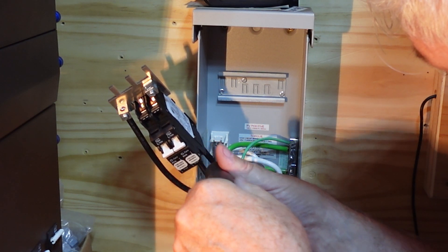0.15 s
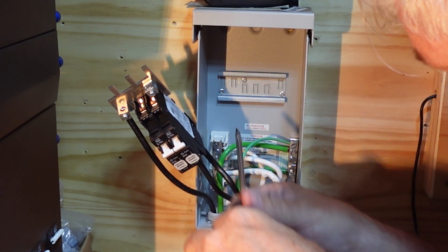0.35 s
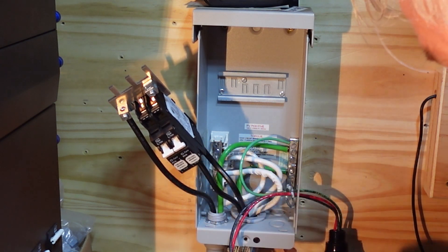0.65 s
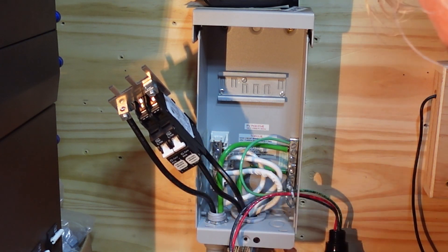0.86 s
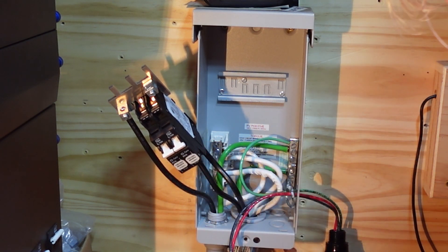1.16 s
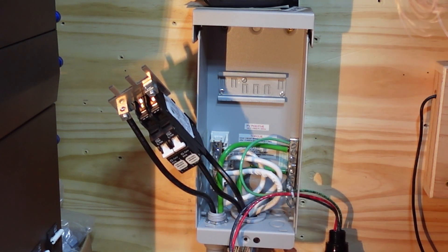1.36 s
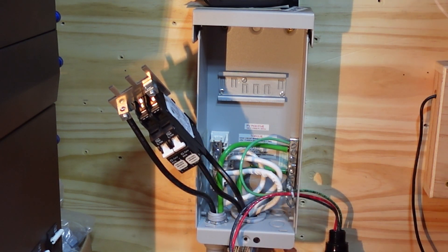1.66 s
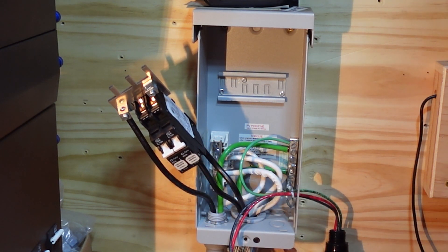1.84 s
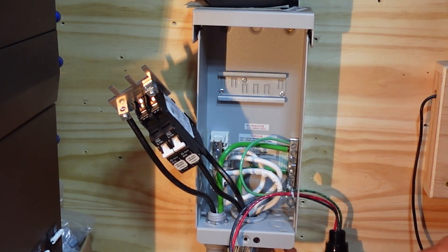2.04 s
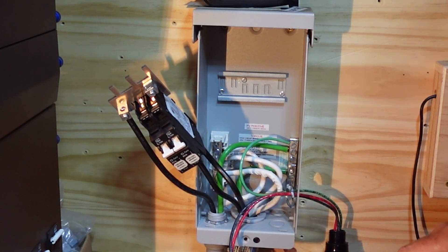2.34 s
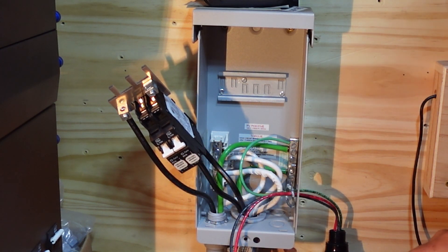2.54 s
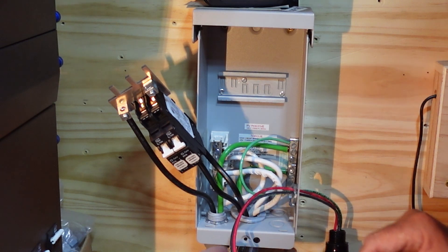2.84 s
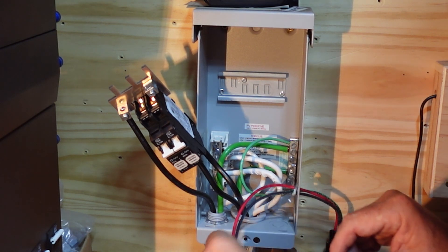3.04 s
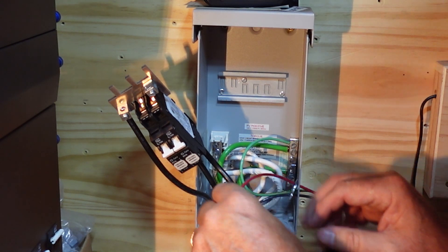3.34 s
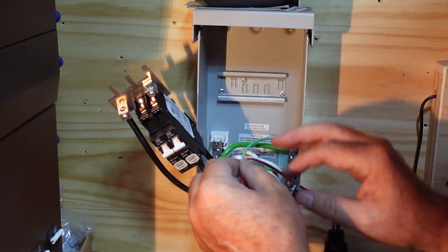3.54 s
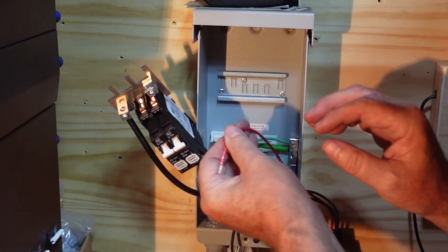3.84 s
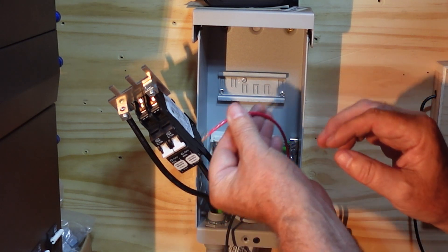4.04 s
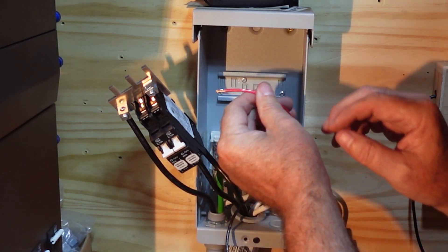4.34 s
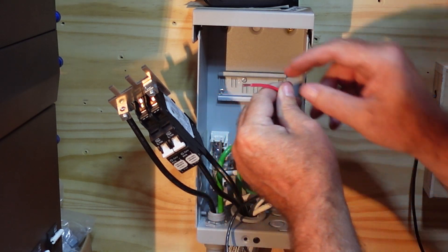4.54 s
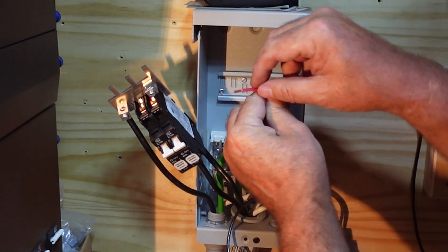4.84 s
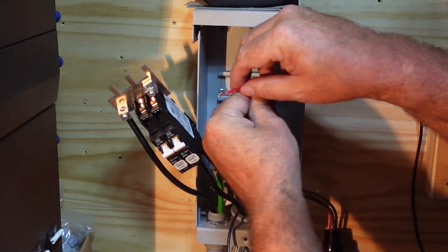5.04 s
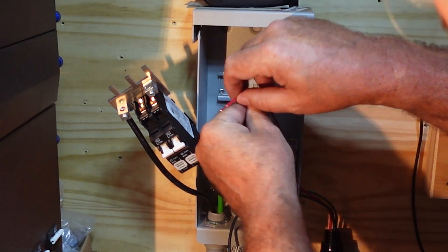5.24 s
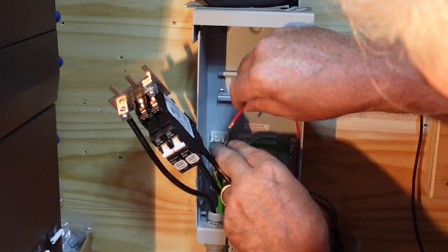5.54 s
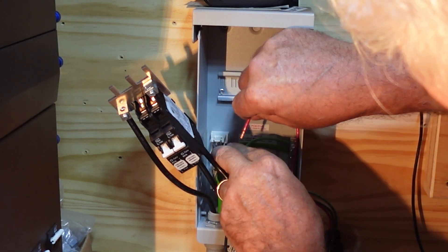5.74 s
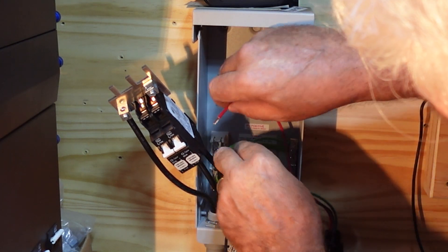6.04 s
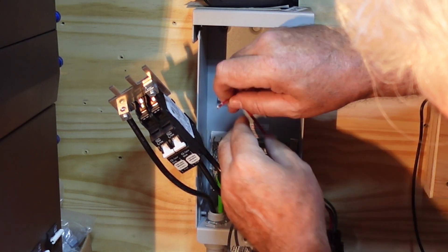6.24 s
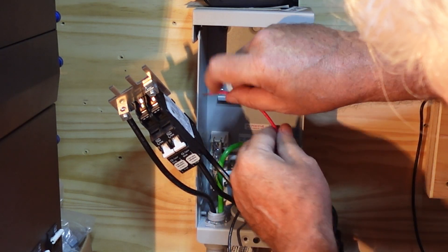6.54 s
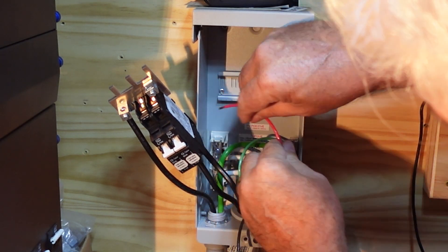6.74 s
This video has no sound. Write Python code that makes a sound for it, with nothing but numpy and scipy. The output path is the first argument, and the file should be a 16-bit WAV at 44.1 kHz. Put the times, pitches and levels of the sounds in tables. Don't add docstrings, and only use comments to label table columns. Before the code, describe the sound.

Close, hissy shed sound: a loud steel-on-wood clatter, dwindling wobble taps, then wire tugs knocking sheet metal, small copper ticks, scrapes and low plank thumps.

```python
import sys
import numpy as np
from scipy import signal
from scipy.fft import rfft, irfft, next_fast_len
from scipy.io import wavfile
from scipy.ndimage import uniform_filter1d

SR = 44100
rng = np.random.default_rng(int(sys.argv[2]) if len(sys.argv) > 2 else 0)


def volts(x):
    e = np.asarray(x, float) / 20
    return 10 ** e


def master_out(mix):
    frames = np.transpose(np.atleast_2d(mix))
    ceiling = np.clip(frames, -1, 1)
    pcm = np.round(ceiling * 32767).astype(np.int16)
    wavfile.write(sys.argv[1], SR, pcm)


N = 303849
SPAN = 16384
BENCH_PAN_DB, BOX_PAN_DB = -2, -1.5
GRIP_SHIFT = 0.025

# (frequency [Hz], width [Hz], level [dB])
BOX = [(589, 23, -1), (1285, 41, 3.5), (1715, 100, 5), (2240, 54, 1.5), (2497, 93, -5), (3340, 64, -4.5),
       (3950, 22, -11), (3900, 100, -17.5), (4380, 76, -29), (5370, 68, -23), (6000, 130, -30.5),
       (6270, 18, -35), (7500, 65, -25.5), (9100, 76, -31.5)]
# (frequency [Hz], density [dB per Hz])
BOX_BED = [(180, -71), (300, -20), (591, -11), (908, -9.5), (1700, -2), (2040, -38), (2260, -10),
           (2890, -11), (4600, -11), (7000, -29.5), (15600, -41)]
# (frequency [Hz], width [Hz], level [dB])
BENCH = [(190, 110, 3.5), (829, 230, 5.5), (1800, 77, -16), (2335, 60, -3.5), (2880, 14, -20.5),
         (2920, 36, -17), (3190, 32, -12), (3560, 54, -6), (4160, 22, -21), (5210, 170, -51.5),
         (6100, 35.3, -28.5), (6040, 28, -29.5), (6470, 73, -18)]
# (frequency [Hz], density [dB per Hz])
BENCH_BED = [(35, -76), (60, -34), (163, 6.5), (476, -4.5), (852, -6), (1450, -25), (2430, -5.5),
             (2730, -16), (3780, -13), (7000, -17.5), (15600, -40)]


def unit(x):
    return x / np.sqrt(np.mean(x ** 2) + 1e-20)


def panned(x, pan_db):
    return x * volts([[pan_db / 2], [-pan_db / 2]])


def along(points, hz):
    f, v = np.transpose(points)
    return np.interp(np.log(hz + 1), np.log(f + 1), v)


def filtered(x, response):
    m = next_fast_len(x.shape[-1] + 8192)
    spectrum = rfft(x, m) * response(np.fft.rfftfreq(m, 1 / SR))
    return irfft(spectrum, m)[..., :x.shape[-1]]


def steep(f, hz):
    return f ** 6 / (f ** 6 + hz ** 6)


def body(modes, bed, bed_db, luck_db):
    loss = 0.012

    def response(f):
        lines = 0
        for k, (hz, width, db) in enumerate(modes):
            damping = 1j * f * (width + loss * hz)
            resonance = damping / (hz * hz - f * f + damping)
            lines = lines + (-1) ** k * volts(db + luck_db[k]) * resonance
        return lines + volts(along(bed, f) + bed_db)
    return response


def strikes(rows, modes, bed, bed_db, low_hz, high_hz, soft_hz, rise, lead_db, gain_db, bass_pan, shift=0):
    lead = 800
    out, f = np.zeros((2, N + SPAN)), np.fft.rfftfreq(SPAN, 1 / SR)
    t = (np.arange(SPAN) - lead) / SR
    after = np.maximum(t, 0)
    low, high = 1 - steep(f, low_hz), steep(f, high_hz)
    yielding = 1 / (1 + (f / soft_hz) ** 2)
    bands = np.array([1 - low - high, high * yielding, low])
    for s, db, treble_db, low_db, length, pan_db in rows:
        blow = volts(-60 * after / max(length, 0.002)) * (1 - np.exp(-after / (rise * length)))
        creak = volts(lead_db - 60 * np.abs(t) / 0.057)
        push = rng.standard_normal(SPAN) * (blow + creak)
        struck = body(modes, bed, bed_db, rng.normal(0, 3, len(modes)))
        detuned = f * (1 + shift * rng.standard_normal())
        parts = irfft(rfft(push) * struck(detuned) * bands, SPAN)
        levels = db + gain_db + np.array([0, treble_db, low_db])
        levels = levels + np.outer([0.5, -0.5], [1, 1, bass_pan]) * pan_db
        out[:, round(s * SR) - lead:][:, :SPAN] += volts(levels) / np.abs(parts).max(axis=1) @ parts
    return out[:, :N]


def rings(rows, modes):
    out, t = np.zeros(N + SPAN), np.arange(SPAN) / SR
    for s, db in rows:
        luck_db = rng.normal(0, 1.5, len(modes))
        for (hz, level_db, t60), extra_db in zip(modes, luck_db):
            decay = volts(db + level_db + extra_db - 60 * t / t60)
            out[round(s * SR):][:SPAN] += decay * np.sin(2 * np.pi * hz * t)
    return out[:N]


def grit(per_second, smooth):
    slips = (rng.random(N) < per_second / SR) * rng.standard_normal(N)
    return unit(slips) + smooth * rng.standard_normal(N)


def strokes(rows):
    grip_s, let_go_s = 0.014, 0.021
    t = np.arange(N) / SR
    power = 0
    for s, length, *db in rows:
        hold = np.interp(t - s, [-grip_s, 0, length, length + let_go_s], [0, 1, 1, 0])
        power = power + np.outer(volts(db), hold) ** 2
    return np.sqrt(power)


def on_box(rows):
    panel_db, follows = -42, 0.52
    contacts = []
    for s, db, treble_db, length in rows:
        low_db = panel_db + follows * (db + 28) - db
        contacts.append((s, db, treble_db, low_db, length, BOX_PAN_DB))
    return contacts


def wires_on_box():
    # (time [s], peak [dB], treble [dB], contact length [s])
    wire_ends = [(3.263, -37.5, 9, 0.015), (3.281, -24, -3, 0.042), (3.297, -32.5, 2, 0.032),
                 (3.58, -37.5, -2, 0.057), (3.605, -42.5, -5, 0.018), (3.663, -35.5, -8, 0.013),
                 (3.763, -49, 2.5, 0.067), (3.789, -39, -8, 0.06), (3.816, -34, -4.5, 0.031),
                 (3.841, -28.5, -12.5, 0.03), (3.864, -35, -5, 0.023), (3.896, -33, -6, 0.019),
                 (3.902, -21.5, -11.5, 0.022), (3.955, -36.5, -3.5, 0.024), (3.969, -28, -1.5, 0.039),
                 (4.024, -41, -27, 0.026), (6.659, -44.5, 3.5, 0.07)]
    # (time [s], peak [dB], treble [dB])
    tugs = [(3.09, -21, -6.5), (3.098, -22, -10), (3.107, -20.5, -13.5), (3.116, -14.5, -10.5),
            (3.126, -20.5, -11), (3.139, -23.5, -12), (3.149, -20, -15), (3.157, -24.5, -4.5),
            (3.172, -33, -15.5), (3.358, -25, -6), (3.364, -19.5, -18.5), (3.369, -20.5, 7),
            (3.377, -9.5, -14), (3.387, -16, -10.5), (3.396, -23, -1), (3.405, -28.5, -9.5),
            (3.422, -27.5, -44), (6.74, -25.5, 3), (6.762, -18.5, -4), (6.779, -17, -4.5),
            (6.798, -20.5, -15), (6.811, -27, -2)]
    # (time [s], peak [dB], treble [dB], panel [dB], contact length [s])
    jolts = [(6.197, -39.5, -15, -15, 0.062), (6.207, -40, -15, -9, 0.034), (6.233, -31.5, -9, -16, 0.036),
             (6.235, -19.5, -8.5, -28, 0.043), (6.244, -20, -8, -25, 0.013), (6.269, -40, -27, -2.5, 0.026),
             (6.284, -37.5, -18, -7, 0.059), (6.319, -43, -20, -12, .05)]
    slip_s = 0.036
    rows = on_box(wire_ends + [(*tug, slip_s) for tug in tugs])
    rows += [(*jolt, BOX_PAN_DB) for jolt in jolts]
    return strikes(rows, BOX, BOX_BED, -2.9, low_hz=905, high_hz=3160, soft_hz=14600, rise=0.092,
                   lead_db=-20.5, gain_db=-0.5, bass_pan=1.0, shift=GRIP_SHIFT)


def copper_on_rail():
    # (time [s], peak [dB], treble [dB], low [dB], contact length [s])
    ticks = [(4.36, -49.5, -25.5, -3.5, 0.05), (4.598, -34, -4, -27, 0.017),
             (4.601, -21.5, -2.5, -25, 0.088), (4.6022, -15, -1, -25, 0.019),
             (4.605, -22.5, -0.5, -23, 0.019), (4.7533, -37, -7, -14, 0.017),
             (4.757, -28, -11, -8.5, 0.049), (5.061, -64.5, 18, -13, 0.035), (5.292, -42, -11, -20, 0.12),
             (5.332, -38, -5, -8, 0.07), (5.347, -51.5, 12.5, -4, 0.091), (5.434, -64, 14, -16, 0.08),
             (5.451, -63.5, 14.5, -14, 0.074), (5.618, -29, 4.5, -17, 0.04), (5.779, -26, -7, -16, 0.055),
             (5.82, -26.5, -8, -11.5, 0.044), (5.837, -33.5, -23, 2, 0.014), (5.997, -34, -35, -23, 0.037),
             (6.059, -44, -25, 0, 0.06), (6.488, -33, -8, -37, 0.041), (6.494, -26, -7, -40, 0.018),
             (6.505, -33.5, -1, -9, 0.029), (6.523, -37.5, -7, 4.5, 0.041), (6.581, -55, 7.5, 7, 0.028)]
    # (frequency [Hz], width [Hz], level [dB])
    rail = [(1083, 97, -10.5), (1363, 54, 3.5), (1691, 58, 0), (2276, 48, -3), (3250, 29, -28),
            (4040, 100, -9.5), (5800, 17, -24), (7250, 38, -12.5), (10530, 510, -34)]
    # (frequency [Hz], density [dB per Hz])
    rail_bed = [(120, -45), (200, -21.5), (704, -12), (2220, -1.5), (2800, -12), (4300, -10.5), (5620, -16),
                (6750, -26.5), (7390, -32), (15600, -44)]
    rows = [(*tick, BOX_PAN_DB) for tick in ticks]
    return strikes(rows, rail, rail_bed, -1.5, low_hz=920, high_hz=3260, soft_hz=13680, rise=0.04,
                   lead_db=-36, gain_db=2.0, bass_pan=1.0, shift=GRIP_SHIFT)


def dragging():
    # (time [s], length [s], drag [dB], fizz [dB])
    drags = [(0.0, 0.14, -75, -85.5), (.32, 0.08, -92, -81.5), (.6, 0.022, -88, -71),
             (1.6, 0.13, -75, -58.5), (2.58, 0.05, -61.5, -68), (2.68, .07, -57.5, -84),
             (2.87, 0.074, -50.5, -73), (2.97, 0.22, -57.5, -64), (3.2, 0.32, -58.5, -65.5),
             (3.66, 0.0403, -59.5, -62), (3.82, 0.23, -82, -62), (4.35, 0.247, -64.5, -90),
             (5.09, 0.057, -77, -58), (5.3, 0.34, -70.5, -66), (6.15, 0.18, -58.5, -66),
             (6.38, 0.63, -61.5, -73.5), (6.7, .22, -57.5, -67.5)]
    # (time [s], length [s], drag [dB], edge [dB])
    scrapes = [
        (5.67, 0.092, -43.5, -55.5),
        (5.84, 0.17, -49.5, -50),
        (6.01, 0.098, -56, -61),
        (6.82, .08, -71, -50.5),
    ]
    # (frequency [Hz], width [Hz], level [dB])
    edge_modes = [(4330, 99, -9.5), (4820, 110, 3), (6010, 44, 0.5), (6590, 60, -9), (7300, 50, -6),
                  (8100, 110, -3.5), (9000, 94, -6.5), (11400, 33, -16), (13200, 100, -19)]
    # (frequency [Hz], density [dB per Hz])
    edge_bed = [(2500, 2), (4500, 3.5), (9000, -4), (15800, -13)]
    drag_gain, fizz_gain = strokes(drags)
    scrape_gain, edge_gain = strokes(scrapes)
    drag = filtered(grit(3000, smooth=0.68), body(BOX, BOX_BED, 8.7, np.zeros(len(BOX))))
    fizz = filtered(grit(3300, smooth=1.0), lambda f: volts(along(edge_bed, f)))
    edge = filtered(grit(4000, smooth=0.46), body(edge_modes, edge_bed, -17.5, np.zeros(len(edge_modes))))
    rub = unit(drag) * (drag_gain + scrape_gain) + unit(fizz) * fizz_gain + unit(edge) * edge_gain
    return panned(rub, -1.6)


def coil_rattle():
    # (time [s], peak [dB], treble [dB], contact length [s])
    rattles = [(0.019, -50.5, -5.5, 0.057), (0.146, -56, -25, 0.1), (2.666, -47.5, -1.5, 0.054),
               (2.734, -25, -4.5, 0.045), (2.803, -26.5, -6, 0.047), (2.852, -28, -9.5, 0.043),
               (2.905, -31.5, -13, 0.029), (2.923, -30.5, -13, 0.014), (2.938, -26, -4.5, 0.065),
               (2.968, -26, -15, 0.073), (3.015, -31, -14, 0.035), (3.052, -26, -0.5, 0.057)]
    # (frequency [Hz], width [Hz], level [dB])
    coil = [(568, 14, -9.5), (1040, 42, -4), (1313, 53, -1.5), (1772, 28, 1), (2200, 18, -13.5),
            (3060, 47, -17), (3237, 96, -8), (3650, 170, -23.5), (3930, 48, -12.5), (4200, 73, -11.5),
            (5040, 40, -18), (5320, 38, -15.5), (7350, 230, -29), (8900, 46, -23)]
    # (frequency [Hz], density [dB per Hz])
    coil_bed = [(300, -44), (600, -5), (1500, -14), (2500, -12), (3300, -7), (5300, -6.5), (5900, -33),
                (15600, -38.5)]
    clip = [(9150, -38, .1)]
    knocks = strikes(on_box(rattles), coil, coil_bed, -8.5, low_hz=870, high_hz=2860, soft_hz=12100,
                     rise=0.051, lead_db=-33, gain_db=-1.0, bass_pan=1.0)
    return knocks + rings([row[:2] for row in rattles[3:]], clip)


def loose_hardware():
    # (time [s], peak [dB])
    screw_touches = [
        (5.1202, -46),
        (5.1714, -53.5),
    ]
    # (frequency [Hz], level [dB], t60 [s])
    screw = [(2590, -1, 0.15), (4447, -9.5, 0.22), (4840, -3, 0.1), (7950, -12, .06)]
    # (time [s], peak [dB])
    nudges = [
        (5.06, -55),
        (5.083, -60.5),
    ]
    # (frequency [Hz], level [dB], t60 [s])
    washer = [(4370, 0, 0.072), (5700, -8, .05), (7300, -6, .06)]
    return rings(screw_touches, screw) + rings(nudges, washer)


def flicks():
    # (time [s], peak [dB])
    flick_times = [(1.378, -30), (2.482, -56), (2.735, -54), (3.053, -54), (3.158, -48), (3.663, -47),
                   (5.317, -58)]
    # (frequency [Hz], density [dB per Hz])
    flick_bed = [(4000, -29.5), (7500, -10.5), (9500, 4.5), (15600, -10.5)]
    contact_s = 0.031
    rows = [(s, db - 30, 30, -30, contact_s, 1) for s, db in flick_times]
    return strikes(rows, [], flick_bed, 0, low_hz=500, high_hz=2000, soft_hz=20000, rise=0.04,
                   lead_db=-36, gain_db=0, bass_pan=1)


def screwdriver_blows():
    # (time [s], peak [dB], treble [dB], thud [dB])
    tumbles = [(1.359, -16.5, -5.5, 0.5), (1.377, -25, 19.5, -12), (1.39, -11, -3.5, -23),
               (1.399, -16, -1.5, -15.5), (1.408, -19.5, 7, -0.5), (1.424, -10, -20.5, 0.5),
               (1.441, -9.5, -17, -17), (1.452, -12.5, -8.5, -14.5), (1.459, -8.5, -1, -16.5),
               (1.467, -11, -1, -14), (1.475, -13, -11, -12), (1.483, -8.5, -5, -10.5),
               (1.492, -13.5, -3, 3.5), (1.502, -25, -3, -4.5), (1.544, -16, -0.5, -1),
               (1.556, -24, -5.5, -9)]
    # (time [s], peak [dB], treble [dB], thud [dB], contact length [s])
    knocks = [(1.521, -21, 9.5, 0, 0.036), (1.5318, -4, -39.5, -9.5, 0.02), (1.536, -10.5, -26.5, -8, .015),
              (1.572, -30, -6.5, 8, 0.02), (1.594, -35, 5, 7.5, .025), (1.6165, -24, -18, -0.5, 0.04),
              (1.628, -32.5, -18, 12, 0.023)]
    # (frequency [Hz], width [Hz], level [dB])
    bench_top = [(260, 140, 16.5), (620, 70, -8), (693, 26, -3), (917, 31, 0.5), (1663, 130, -12.5)]
    contact_s = 0.039
    blows = strikes([(*row, contact_s, BENCH_PAN_DB) for row in tumbles], BENCH, BENCH_BED, -2.5,
                    low_hz=494, high_hz=1669, soft_hz=6100, rise=0.061, lead_db=-41.5, gain_db=-4.0,
                    bass_pan=0.137)
    blows += strikes([(*row, BENCH_PAN_DB) for row in knocks], bench_top, BENCH_BED, -14.5,
                     low_hz=384, high_hz=1494, soft_hz=8040, rise=0.0247, lead_db=-31.0, gain_db=-1.0,
                     bass_pan=0.15)
    return blows


def screwdriver_steel():
    # (time [s], shaft [dB], tip [dB])
    clangs = [(1.379, -22, -28), (1.411, -19.5, -46), (1.424, -20.5, -54.5), (1.434, -19.5, -57),
              (1.459, -17, -49.5), (1.476, -15.5, -52.5), (1.492, -18.5, -38), (1.522, -24.5, -41.5),
              (1.544, -36.5, -33.5), (1.554, -32, -53.5), (1.573, -37, -41.5), (1.587, -49.5, -47),
              (1.603, -46, -41.5), (1.619, -50.5, -52.5)]
    # (frequency [Hz], level [dB], t60 [s])
    shaft_modes = [(1895, -11, 0.086), (2390, -3, 0.18), (2330, -8.5, .1), (2961, -14, 0.13),
                   (3660, -12, 0.034), (5195, -24, .07), (5798, -29, .1), (6300, -24.5, 0.044)]
    # (frequency [Hz], level [dB], t60 [s])
    tip_modes = [(10460, -2, 0.018), (6350, -6, .02), (7800, -12.5, .015)]
    shaft = rings([(s, db) for s, db, _ in clangs], shaft_modes)
    tip = rings([(s, db) for s, _, db in clangs], tip_modes)
    return panned(shaft + tip, BENCH_PAN_DB)


def screwdriver_skidding():
    # (time [s], length [s], level [dB])
    skids = [
        (1.39, 0.23, -27),
        (1.55, 0.019, -38),
    ]
    dull_hz = 4500
    bench = body(BENCH, BENCH_BED, -27.0, np.zeros(len(BENCH)))
    rub = filtered(grit(600, smooth=0.41), lambda f: bench(f) / (1 + (f / dull_hz) ** 2))
    return panned(unit(rub) * strokes(skids)[0], BENCH_PAN_DB)


def rocking_part():
    # (time [s], peak [dB], treble [dB], thud [dB])
    landings = [
        (1.918, -37, 6, -15),
        (1.931, -29, -15, -17),
        (1.941, -31, -21, -10),
        (1.948, -37, -13, -13),
        (2.354, -51.5, -1.5, -16),
    ]
    turns = [1.916, 2.12, 2.266, 2.374, 2.461, 2.532, 2.585, 2.629]
    # (frequency [Hz], width [Hz], level [dB])
    rocker = [(163, 28, -24), (376, 34.5, -9), (730, 25, -8.5), (929, 19.6, -7.5), (1377, 26, -25),
              (1847, 35, -15.5), (2670, 100, -26), (3540, 31, -23.5)]
    # (frequency [Hz], density [dB per Hz])
    rocker_bed = [(35, -34.5), (60, -7.5), (163, 13.5), (499, -17.5), (913, -21), (1150, -16.5),
                  (1880, -19.5), (2060, -16), (6500, -17), (9000, -23.5), (15600, -43.5)]
    land_s, rock_s, pan_db = 0.019, 0.073, -3
    swing_db, far_edge_db, thud_db = -23.5, 2.5, -14.5
    first_treble_db, dulls_db = 1, -3
    rows = [(*row, land_s, pan_db) for row in landings]
    for k, (s, swing) in enumerate(zip(turns[1:], np.diff(turns))):
        peak_db = swing_db + 20 * np.log10(swing) + far_edge_db * (k % 2)
        rows.append((s, peak_db, first_treble_db + dulls_db * k, thud_db, rock_s * np.sqrt(swing), pan_db))
    return strikes(rows, rocker, rocker_bed, -11.0, low_hz=536, high_hz=1620, soft_hz=4640, rise=0.017,
                   lead_db=-27, gain_db=3.5, bass_pan=0.18)


def plank_bumps():
    # (time [s], peak [dB], frequency [Hz])
    thumps = [(3.096, -47.5, 224), (3.276, -50, 154), (3.378, -40, 145), (3.501, -45, 150),
              (3.978, -39, 176), (4.034, -62, 254), (4.629, -43.5, 198), (5.336, -59, 202),
              (6.187, -40, 156), (6.425, -47, 151), (6.452, -45.5, 140), (6.527, -54, 182),
              (6.682, -36.5, 170), (6.712, -41, 222), (6.745, -44, 208), (6.782, -34, 175)]
    t60_s = 0.054
    out, t = np.zeros(N + SPAN), np.arange(SPAN) / SR
    for s, db, hz in thumps:
        phase = 2 * np.pi * hz * (t + 0.001 * (1 - np.exp(-t / 0.014)))
        envelope = volts(db + 4.5 - 60 * t / t60_s) * (1 - np.exp(-t / 0.00097))
        out[round(s * SR):][:SPAN] += envelope * np.sin(phase)
    return out[:N]


def leaning():
    # (time [s], length [s], level [dB])
    presses = [(0.0, 0.17, -66), (2.66, .12, -65), (2.95, 1.16, -62), (6.14, .8, -62.5), (6.5, 0.12, -56.5),
               (6.74, 0.15, -56)]
    # (frequency [Hz], width [Hz], level [dB])
    plank_modes = [(84, 25, -2), (151, 29, -3.5), (203, 39, -6)]
    planks = body(plank_modes, [(20, -90)], 0, np.zeros(len(plank_modes)))
    rumble = filtered(rng.standard_normal(N), lambda f: planks(f) * (1 - steep(f, 480)))
    return unit(rumble) * strokes(presses)[0]


def shed(x):
    # (frequency [Hz], t60 [s])
    decay = [(150, .24), (1000, .15), (8000, .13)]
    hz, t, z = signal.stft(rng.standard_normal((2, SR // 2)), SR, nperseg=256)
    fading = volts(-60 * t / along(decay, hz)[:, None])
    mid, side = signal.istft(z * fading, SR, nperseg=256)[1]
    side = filtered(side, lambda f: 0.4 * steep(f, 450) + 0.4 * steep(f, 3800))
    tail = mid + side * np.array([[1], [-1]])
    delayed = np.pad(x, ((0, 0), (200, 0)))
    return signal.fftconvolve(delayed, tail / np.linalg.norm(tail[0]), axes=1)[:, :N]


def hiss():
    # (frequency [Hz], density [dB per Hz])
    spectrum = [(25, -44.5), (71, -16), (129, -12), (340, -8.5), (584, -12.5), (1500, -16), (3450, -20),
                (8000, -24.5), (15600, -31.5)]
    # (frequency [Hz], left-right likeness [0 to 1])
    likeness = [(60, 0.44), (240, 0.63), (950, 0.83), (3770, 0.56), (15000, 1)]
    z = signal.stft(rng.standard_normal((2, N)), nperseg=512)[2]
    patches = uniform_filter1d(uniform_filter1d(rng.standard_normal(z.shape[1:]), 8, 0), 12, 1)
    pair = signal.istft(z * volts(unit(patches)), nperseg=512)[1][:, :N]

    def mid_side(hz):
        angle = np.arccos(np.clip(along(likeness, hz), -1, 1)) / 2
        return volts(along(spectrum, hz)) * [np.cos(angle), np.sin(angle)]
    mid, side = filtered(pair, mid_side)
    return panned(volts(-61) * unit(np.array([mid + side, mid - side])), -0.8)


def scene():
    near = wires_on_box() + copper_on_rail() + dragging() + coil_rattle() + loose_hardware() + flicks()
    near += screwdriver_blows() + screwdriver_steel() + screwdriver_skidding() + rocking_part()
    near += plank_bumps()
    return near + volts(-7.0) * shed(near) + leaning() + hiss()


def band_limit(x):
    return signal.sosfilt(signal.butter(12, 15760, fs=SR, output="sos"), x)


def record(dry):
    # (frequency [Hz], level [dB])
    ports = [(200, 1), (700, -0.45), (5000, -0.5), (12000, 3)]

    def capsules(f):
        bass = 0.06 + 0.94 * steep(f, 78)
        return bass * volts(along(ports, f) * np.array([[0.5], [-0.5]]))
    heard = filtered(dry, capsules)
    held = heard / (1 + np.abs(heard / 0.8) ** 4) ** (1 / 4)
    mix = filtered(held, lambda f: f < 15760)
    return band_limit(mix)


dry = scene()
out = record(dry)
master_out(out)
```